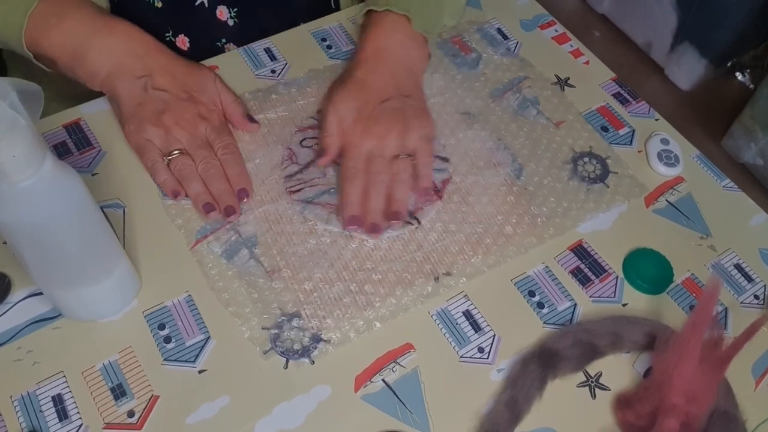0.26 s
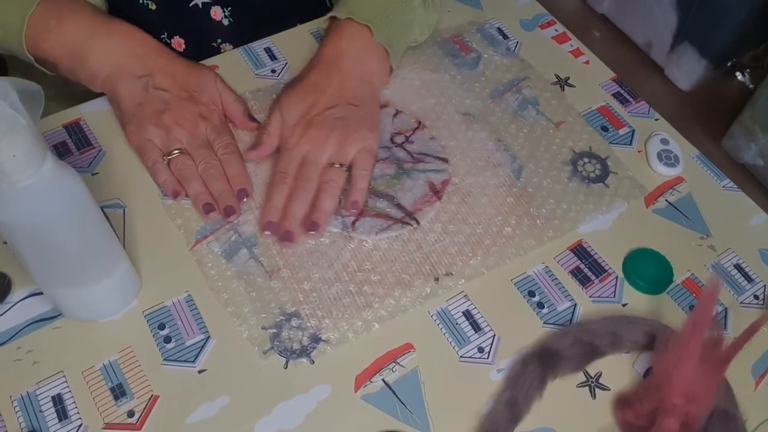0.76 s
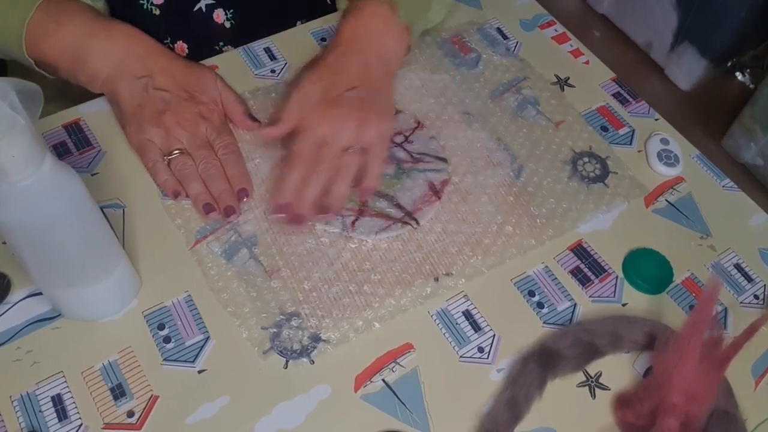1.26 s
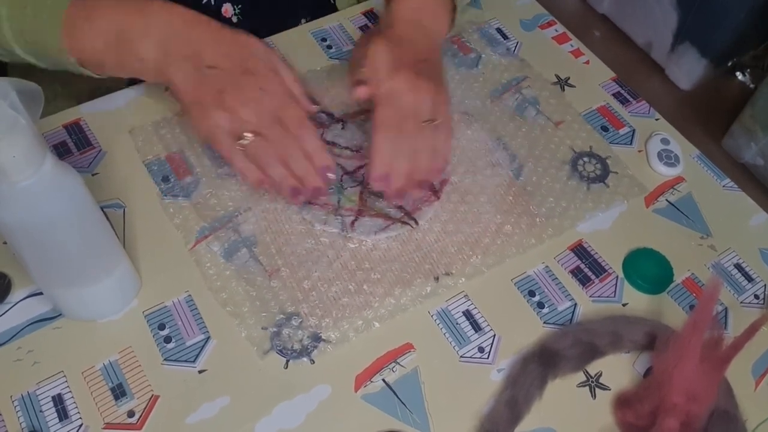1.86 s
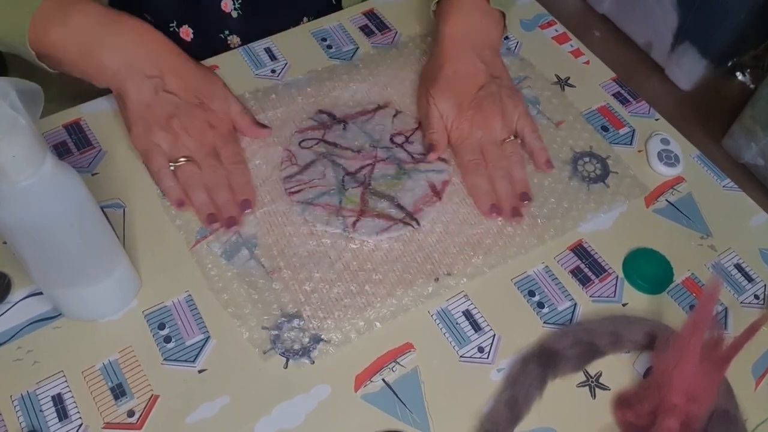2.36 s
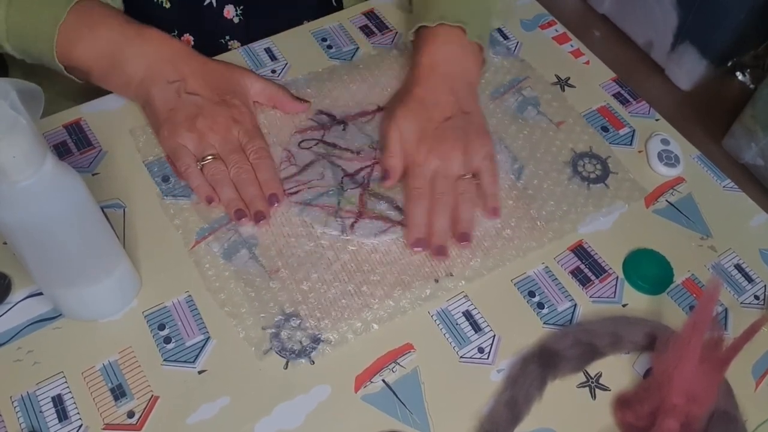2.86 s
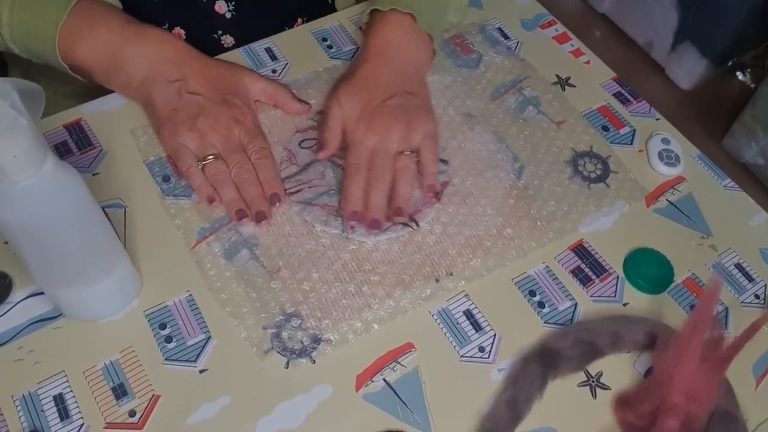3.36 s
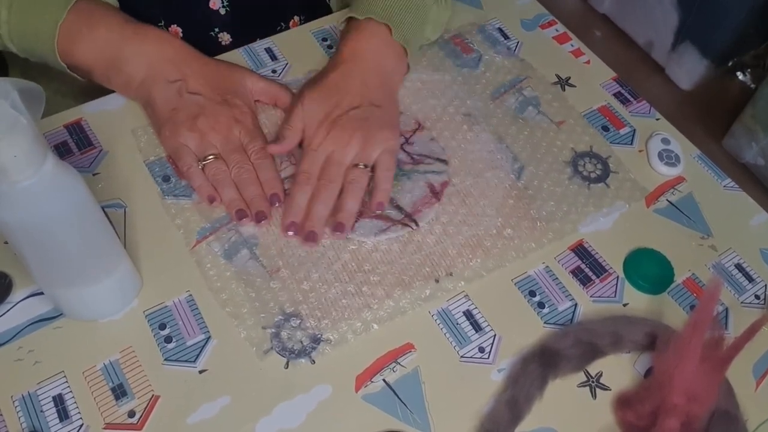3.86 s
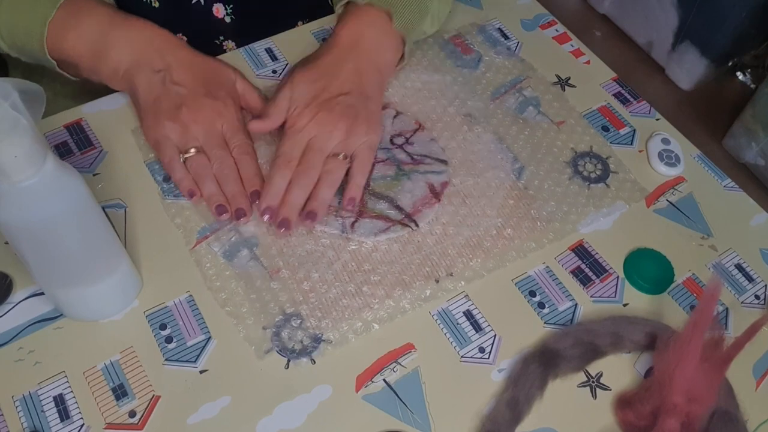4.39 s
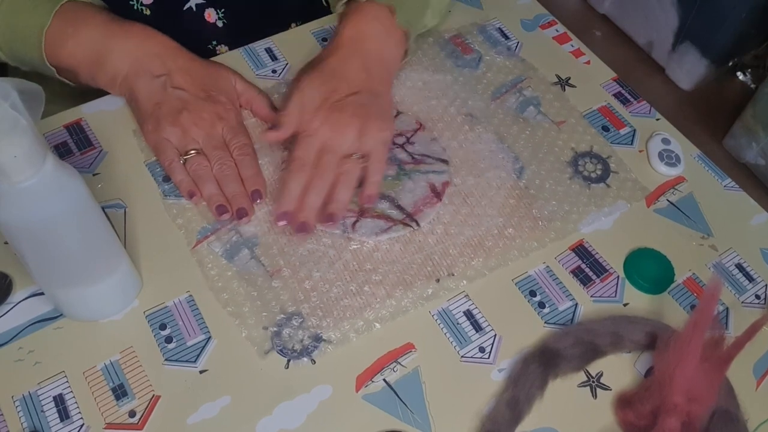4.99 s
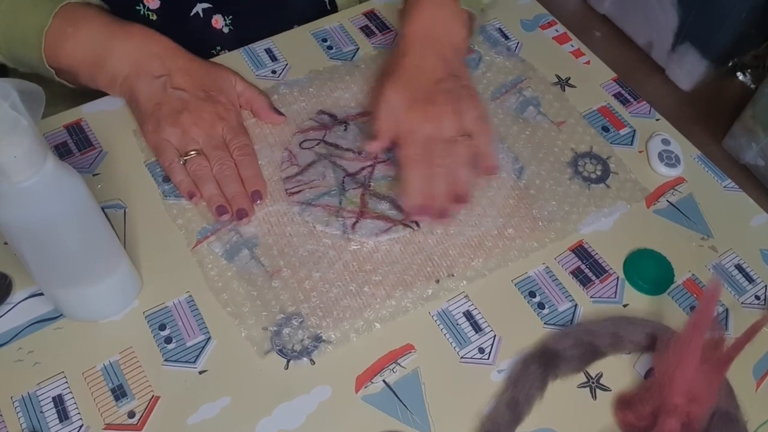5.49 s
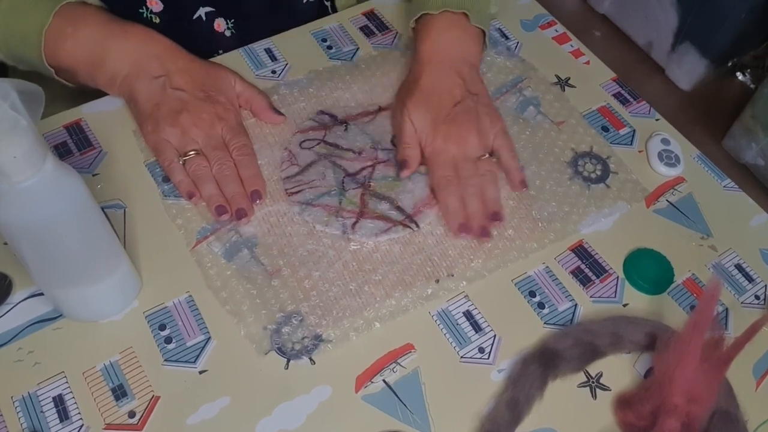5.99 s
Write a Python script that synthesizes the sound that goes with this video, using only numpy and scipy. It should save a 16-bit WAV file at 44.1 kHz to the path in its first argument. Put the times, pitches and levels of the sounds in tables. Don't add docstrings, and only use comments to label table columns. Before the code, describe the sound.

A close stereo sound of a palm rubbing bubble wrap over wet soapy wool on a light table, in a quiet room with faint low rumble. It opens with a brief touch, then a grainy wet swish from 0.1 to 0.5 s. Longer swishes follow at 0.7-1.1, 1.3-1.7 and 1.95-2.35 s, each landing with a film slap and a dull, short table knock. Around 2.55-2.95 s several quick contacts bunch together with sharp slaps. Swishes return at 3.2-3.6 and 3.8-4.2 s, then short dabs and a hard snap near 4.45 s lead into another stroke to 4.8 s. Further strokes come at 5.1-5.4 and 5.65-6.0 s. In the gaps the hiss drops almost to silence, leaving tiny foam ticks and crackle. Left is bright and direct; right is duller, with more table.

```python
import sys
import numpy as np
from scipy import signal
from scipy.fft import rfft, irfft
from scipy.io import wavfile

SR = 44100
rng = np.random.default_rng(int(sys.argv[2]) if len(sys.argv) > 2 else 0)


def wav_record(signal):
    frames = np.transpose(np.atleast_2d(signal))
    bounded = np.clip(frames, -1, 1)
    quanta = np.round(bounded * 32767).astype(np.int16)
    wavfile.write(sys.argv[1], SR, quanta)


def volts(x):
    e = np.asarray(x, float) / 20
    return 10 ** e


N = 275177


def rms_one(x):
    return x / np.sqrt(np.mean(x ** 2) + 1e-20)


def drift(rate_hz):
    sos = signal.butter(2, rate_hz, fs=SR, output="sos")
    return rms_one(signal.sosfilt(sos, rng.standard_normal(N + SR))[SR:])


def clicks(times, sizes):
    return np.bincount(np.round(np.array(times) * SR).astype(int), sizes, N)[:N] + 1e-18


def ring(x, hz, t60):
    r, w = volts(-60 / (t60 * SR)), 2 * np.pi * hz / SR
    return signal.lfilter([0, np.sin(w)], [1, -2 * r * np.cos(w), r * r], x)


def scatter(x, t60):
    tail = rng.standard_normal(SR // 2) * volts(-60 * np.arange(SR // 2) / SR / t60)
    return signal.fftconvolve(x, tail / np.sqrt(np.sum(tail ** 2)))[:N]


def colour(x, points):
    hz, db = np.transpose(points)
    grid = np.arange(4097) * SR / 8192 + 1
    cepstrum = irfft(np.log(volts(np.interp(np.log(grid), np.log(hz), db))))
    cepstrum[1:4096] *= 2
    cepstrum[4097:] = 0
    return signal.fftconvolve(x, irfft(np.exp(rfft(cepstrum))))[:N]


# start_s, end_s, first_level_db, full_sweep_level_db, last_level_db
CONTACTS = [(0.003, 0.042, -61, -51.5, -55.5), (0.085, 0.469, -53.5, -51, -52),
            (0.697, 1.103, -52.5, -48.5, -53), (1.309, 1.696, -53, -47, -52.5),
            (1.94, 2.369, -56, -50, -50.5), (2.556, 2.597, -48, -54, -61),
            (2.608, 2.697, -60, -54.5, -50.5), (2.706, 2.958, -51, -47, -44.5),
            (3.213, 3.598, -55.5, -53.5, -51.5), (3.807, 4.197, -59.5, -49, -53),
            (4.205, 4.254, -52.5, -52.5, -53.5), (4.406, 4.449, -62, -57.5, -53),
            (4.449, 4.833, -53.5, -52, -51.5), (5.067, 5.405, -55.5, -51, -49.5),
            (5.663, 6.034, -54.5, -52.5, -54)]
# landing_shake_db, lifting_shake_db, dull_swish_db, bright_swish_db, foam_left_db
BEARING = [(-54, -43, -15, -1, -65.5), (-43.5, -64.5, -7.5, 2, -70.5), (-47, -60, -9, 0, -72.5),
           (-42, -63, -10, 0, -67), (-46, -65.5, -10, -2.5, -68.5), (-76, -52, -9, 3, -59),
           (-33, -48.5, -10.5, 1, -67), (-45, -57.5, -12.5, -2.5, -71), (-49.5, -68, -8, 3, -77.5),
           (-52, -62.5, -9, 3, -81), (-79, -71, -8, 4, -76), (-53, -44, -7, 5, -66),
           (-34, -76, -8, 5.5, -74.5), (-53.5, -57.5, -10.5, 0, -72), (-48.5, -65.5, -9, 2, -72)]
# fullest_share (of its length), lift_fade_db_per_s, table_calming_db_per_s
PACE = [(.4, 350, 152), (0.41, 418, 47), (.8, 302, 200), (0.72, 350, 500), (0.59, 418, 152),
        (0.41, 440, 300), (0.94, 400, 300), (0.68, 259, 300), (0.82, 328, 46), (0.68, 350, 300),
        (0.9, 303, 200), (0.41, 300, 300), (.45, 364, 150), (0.39, 258, 300), (0.45, 412, 250)]
# share (of its length, past 1 the palm is off), dull_change_db, bright_change_db
SWEEP_COLOUR = [
    (0, 4, -2.5),
    (.12, 2.5, -2.5),
    (.4, 1, 5),
    (.75, 1.5, 0.5),
    (1, 2, -4),
    (1.25, 0, -2),
    (1.6, 0.5, -2),
]


def palm():
    land_s, shake_late_s = 0.018, 0.0052
    grip_db, grip_s = 0.5, 0.04
    foam_fall_db_per_s, foam_rest_db, shake_rest_db = 55.5, -86, -87
    t = np.arange(N) / SR
    clumps_db = 1.5 * drift(30)
    hiss, shake = volts(foam_rest_db) ** 2, volts(shake_rest_db) ** 2
    dull_db, bright_db = np.zeros(N), np.zeros(N)
    share, dull_change, bright_change = np.transpose(SWEEP_COLOUR)
    for contact, bearing, pace in zip(CONTACTS, BEARING, PACE):
        lands, lifts, first_db, full_db, last_db = contact
        push_db, eased_db, dull, bright, left_db = bearing
        fullest, fade_db, calm_db = pace
        along = (t - lands) / (lifts - lands)
        off = np.maximum(t - lifts, 0)
        landed = np.clip((t - lands) / land_s, 0, 1) ** 2

        rub_db = np.interp(along, [0, np.clip(fullest, .1, .9), 1], [first_db, full_db, last_db])
        rub_db = rub_db - fade_db * off
        rub_db = rub_db - grip_db * np.exp(-((t - lands) / grip_s - 1) ** 2 * 5.0)
        foam_db = left_db - foam_fall_db_per_s * off + clumps_db
        hiss = hiss + landed * (volts(rub_db) ** 2 + volts(foam_db) ** 2)

        press_db = np.interp(along, [0, 1], [push_db, eased_db]) - calm_db * off
        pressed = np.roll(landed, round(shake_late_s * SR)) * (along > 0)
        shake = shake + pressed * volts(press_db) ** 2

        dull_db = np.where(landed > 0, dull + np.interp(along, share, dull_change), dull_db)
        bright_db = np.where(landed > 0, bright + np.interp(along, share, bright_change), bright_db)
    return 10 * np.log10(hiss), dull_db, bright_db, 10 * np.log10(shake)


def slips(per_s):
    sizes = volts(1.75 * np.minimum(rng.exponential(1, N), 5)) * rng.choice([-1, 1], N)
    chance = per_s / SR
    jerks = sizes * (rng.random(N) < chance) / np.sqrt(np.clip(chance, 1e-3, 1))
    return rms_one(rms_one(jerks) + 0.58 * rng.standard_normal(N))


# start_s, peak_level_db
SLAPS = [(0.0178, -36), (0.0344, -37), (0.0904, -38), (0.112, -31.5), (0.6987, -33), (0.7035, -28),
         (1.3154, -32.5), (1.323, -26), (1.7096, -31), (1.946, -44), (1.9634, -33), (2.5525, -49),
         (2.5696, -49), (2.611, -26.5), (2.657, -26.5), (2.7126, -26), (2.726, -29.5), (3.2154, -48),
         (3.2235, -54), (3.236, -36.5), (3.819, -40), (3.8346, -33), (4.241, -27), (4.33, -52.5),
         (4.4153, -48), (4.4242, -47), (4.4556, -23), (5.0755, -36.5), (5.0805, -32.5), (5.674, -28.5)]


def slaps():
    t60_s, rise_s = 0.047, 0.0026
    level = np.zeros(N)
    for start_s, db in SLAPS:
        start = round(start_s * SR)
        age = np.arange(N - start)[:SR // 4] / SR
        burst = volts(db - 11.5 - 60 * age / t60_s) * (1 - np.exp(-age / rise_s))
        level[start:start + len(age)] += burst
    return level


SPLIT_HZ = [2250, 7250]


def film(hiss_db, dull_db, bright_db):
    per_s = 9000 * volts(.6 * (hiss_db + 51.5))
    near, far = slips(per_s), slips(4 * per_s)
    far = 0.41 * near + far
    flutter = volts(1.0 * drift(136) + 0.16 * drift(40))
    level = np.hypot(volts(hiss_db) * flutter, slaps())

    low, high = SPLIT_HZ
    dull_gain = volts(0.88 * (dull_db + 10.0) + 1.0 * drift(19))
    bright_gain = volts(.5 * (bright_db - 7.5) + 0.2 * drift(60))
    bands = [(low, "low", dull_gain),
             ([low, high], "band", -1),
             (high, "high", bright_gain)]
    swish = 0
    for edge, kind, gain in bands:
        sos = signal.butter(2, edge, kind, fs=SR, output="sos")
        swish = swish + gain * signal.sosfilt(sos, [near, far])
    return level * swish


# start_s, peak_level_db, pitch_hz
TICKS = [(0.5434, -42, 4800), (0.5695, -47, 7060), (0.6253, -45, 8450), (1.1758, -48, 5950),
         (1.2374, -51, 5600), (1.2707, -48, 5270), (1.2961, -44, 5900), (1.7805, -51, 4200),
         (1.8156, -51, 5800), (1.8377, -41, 12500), (1.8545, -65, 4100), (1.8958, -43, 12500),
         (1.934, -49, 12300), (2.5174, -45, 14800), (3.0603, -51, 3400), (3.094, -42, 12340),
         (3.104, -47, 3750), (3.1663, -54, 4020), (3.6735, -49, 5360), (0.4645, -32, 4800),
         (4.2645, -26, 3460), (4.3903, -52, 13900), (4.94, -34, 9300), (3.7728, -54, 5300),
         (0.6157, -47, 7730), (5.5114, -48, 11600), (5.5298, -42, 10800), (5.5573, -49, 5100),
         (6.1159, -42, 13600), (1.8696, -43, 12100)]


def ticks(hiss_db):
    out = np.zeros(N)
    for start_s, db, hz in TICKS:
        click = clicks([start_s], [volts(db + 3)])
        out += ring(click, hz, 12.5 / hz) + .3 * np.diff(click, prepend=0)

    foam_db = 0.5 * (np.minimum(hiss_db, -66) + 82)
    sizes = volts(-60 + foam_db + 3.2 * np.minimum(rng.exponential(1, N), 4.2))
    sizes = sizes * (rng.random(N) < 350 / SR)
    dealt = rng.integers(0, 8, N)
    for k, hz in enumerate(np.geomspace(3600, 14500, 8)):
        out += ring(sizes * (dealt == k) + 1e-18, hz, 4.1 / hz)
    return out


# start_s,
# knock_level_db, low_sway_db, upper_modes_db
THUMPS = [(0.029, -46, -16, -5.5), (0.091, -46.5, -3, -11.5), (0.158, -50, -3, -14),
          (0.707, -37.5, 0, -6.5), (0.74, -47.5, 3, -20), (0.842, -54.5, -13, 5.5),
          (1.322, -33.5, -7, -11.5), (1.367, -45.5, -13, -18), (1.966, -43, -25, -13), (2.088, -48, 1, -3),
          (2.103, -52, 9, 0.5), (2.575, -47, 0, 0), (2.611, -35, -21, -9.5), (2.658, -47, -16, -20),
          (2.715, -35.5, -2, -13.5), (3.231, -43.5, -9, -12), (3.301, -56.5, 13, -28),
          (3.837, -44.5, -2.5, -14), (3.899, -55, -12, -18), (4.428, -51, 8, -4), (4.46, -32.5, -1, -3),
          (4.519, -48, 4, -8), (5.084, -41, -4, -11.5), (5.674, -50.5, 17.5, 1), (5.718, -63, 20, -1),
          (0.529, -73, 11.5, -12), (0.6, -72, 12, -17), (2.49, -74, 5, -2), (3.661, -75, 11, -12),
          (4.779, -76, 15, -10)]
# pitch_hz, left_level_db, right_level_db, t60_s
TABLE_MODES = [(50, 4.5, 4.5, 0.091), (77.9, 4, 2.5, 0.13), (90.7, 0, -4.5, 0.18),
               (118.75, -16.5, -1, 0.38), (151, -34.5, -11.5, 0.67), (163.2, -1.5, 1, 0.099),
               (211, -11, -6.5, 0.12), (260, -4, 0, 0.083), (356.5, -4, -7.5, 0.1), (436, -7, -7, 0.11),
               (544.6, -18, -17, 0.21), (655, -12, -7, 0.044), (750, -8.5, -18, 0.12),
               (848, -9.5, -12, 0.08), (992, -13.5, -18, 0.073), (1190, -7, -16, 0.017),
               (1420, -27, -17, 0.039)]


def table(shake_db):
    swelling_mode = 5
    times, knock_db, sway_db, upper_db = np.transpose(THUMPS)
    chance = rng.standard_normal((len(times), len(TABLE_MODES)))
    out = np.zeros((2, N))
    for k, (hz, left_db, right_db, t60) in enumerate(TABLE_MODES):
        group = int(hz > 130) + int(hz > 200)
        strike_db = knock_db + [sway_db, 0, upper_db + 5][group] + 1.77 * chance[:, k]
        late = [.7, .05, .4][group] / hz
        struck = ring(clicks(times + late, volts(strike_db)), hz, t60)
        if k == swelling_mode:
            struck = ring(struck, hz, t60) * 2 * np.e * np.log(1000) / (t60 * SR)

        drag = [rms_one(ring(rng.standard_normal(N), hz, 0.6 * t60)) for _ in range(3)]
        drag_gain = volts(shake_db - [9, 16, 28][group])
        for side, db in enumerate([left_db, right_db]):
            lag = side * round(.12 * SR / hz)
            dragged = drag_gain * (1.36 * drag[2] + 1.06 * drag[side]) * volts([-5, 0][side])
            out[side] += volts(db) * (np.roll(struck, lag) + dragged)
    return out


# pitch_hz, level_db (per Hz)
ROOM_TONE = [(25, -20), (45, 1), (90, 2.5), (130, -13), (180, -8), (400, -16.5), (750, -17), (1500, -23.5),
             (3000, -28), (6000, -45), (15000, -56)]
ROOM_TONE_DB = [
    [-74.5],
    [-70.5],
]


def room_tone():
    shared = rng.standard_normal(N)
    tone = [rms_one(colour(0.35 * shared + rng.standard_normal(N), ROOM_TONE)) for _ in range(2)]
    return volts(np.array(ROOM_TONE_DB)) * tone


# pitch_hz, level_db (per Hz)
FACING = [(300, -24.5), (600, -18), (880, -8), (1130, -9), (1400, -8), (1600, -4.5), (2150, -7),
          (2550, -5.5), (3050, -1.5), (4200, 0), (5500, -3), (8000, -4.5), (12500, 1.5), (15500, 1)]
# pitch_hz, level_db (per Hz)
SHADOWED = [(350, -18.5), (600, -29), (850, -14.5), (1250, -27.5), (1700, -18), (2500, -25.5), (3200, -17),
            (4600, -21), (6800, -42.5), (7900, -87), (9200, -16.5), (10600, -9.5), (14300, -30),
            (15200, -46)]


def scene():
    hiss_db, dull_db, bright_db, shake_db = palm()
    foam = ticks(hiss_db)
    near, far = volts(12) * film(hiss_db, dull_db, bright_db)
    near = near + volts(-37) * ring(near, 3303, 0.005)

    direct = near + foam
    facing = colour(direct + volts(-13.0) * scatter(direct, 0.064), FACING)
    around = far + scatter(far, 0.036) + scatter(0.46 * foam, 0.018)
    shadowed = colour(around, SHADOWED)
    return np.array([facing, shadowed]) + table(shake_db) + room_tone()


def band_limit(x):
    return signal.sosfilt(signal.butter(12, 16630, fs=SR, output="sos"), x)


def record(dry):
    bass_cut = signal.butter(6, 40, "high", fs=SR, output="sos")
    top_cut = signal.ellip(10, .5, 70, 15850, fs=SR, output="sos")
    mix = signal.sosfilt(top_cut, signal.sosfilt(bass_cut, dry))
    return band_limit(mix)


dry = scene()
out = record(dry)
wav_record(out)
```